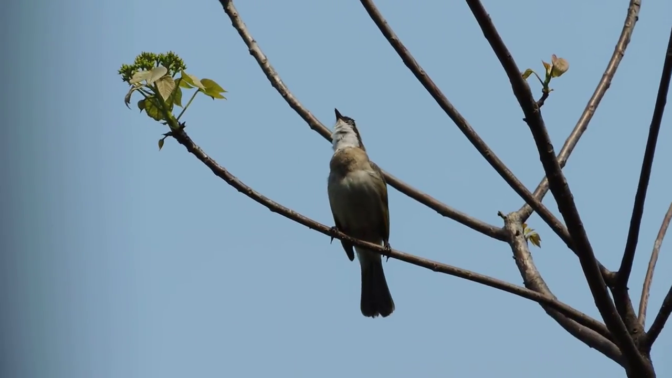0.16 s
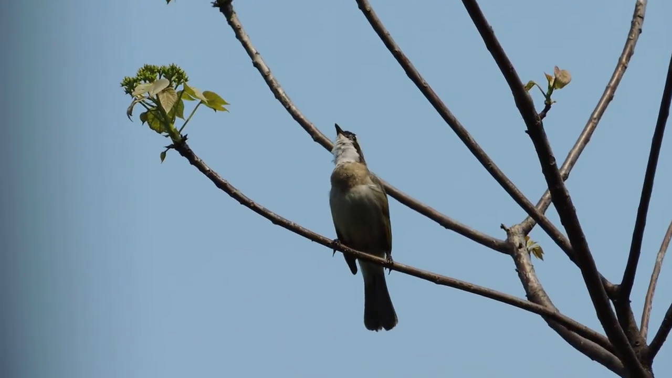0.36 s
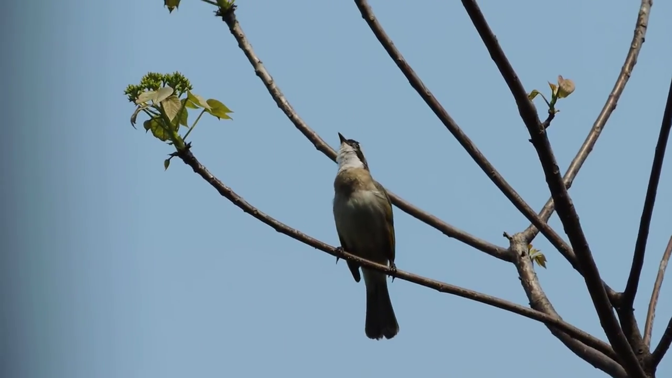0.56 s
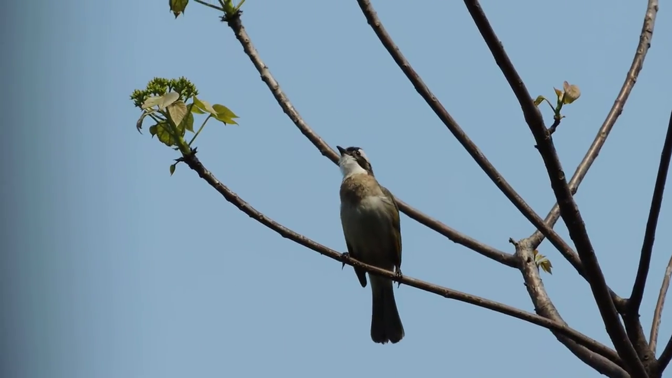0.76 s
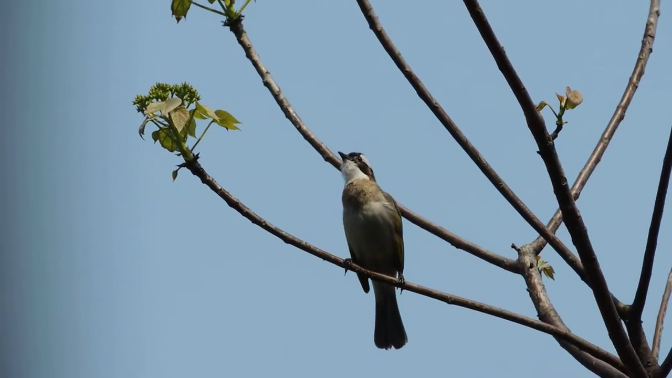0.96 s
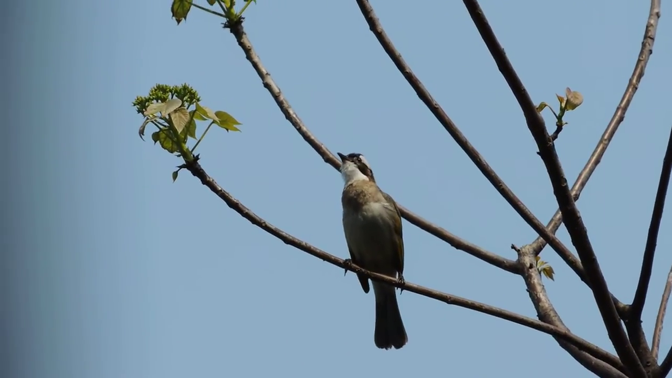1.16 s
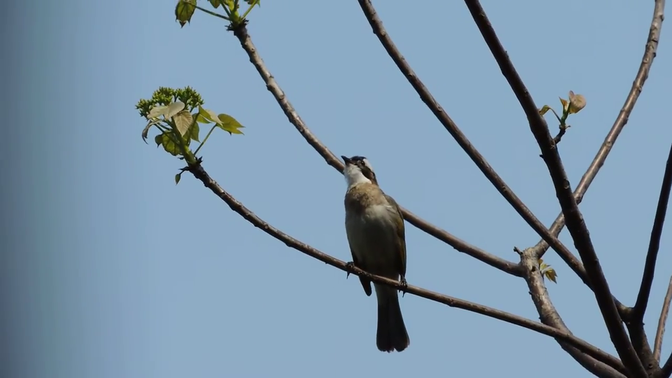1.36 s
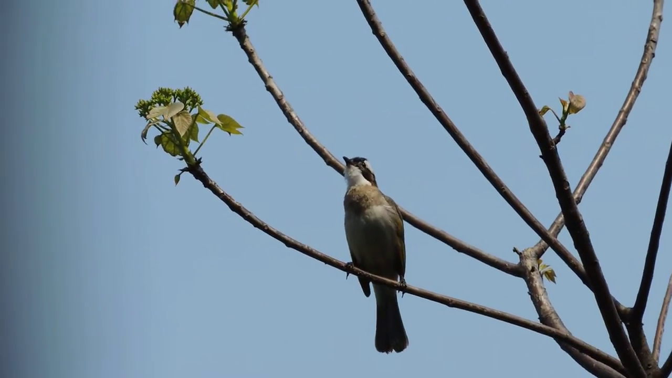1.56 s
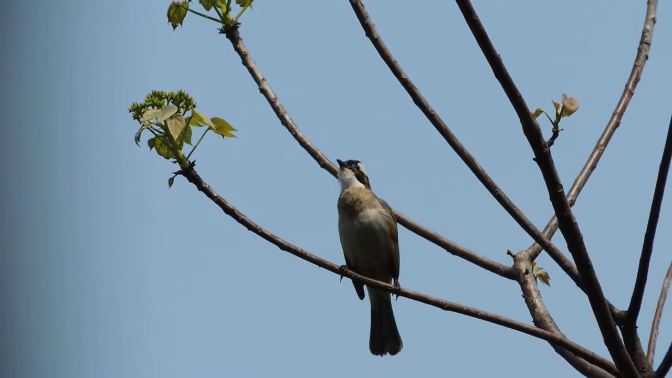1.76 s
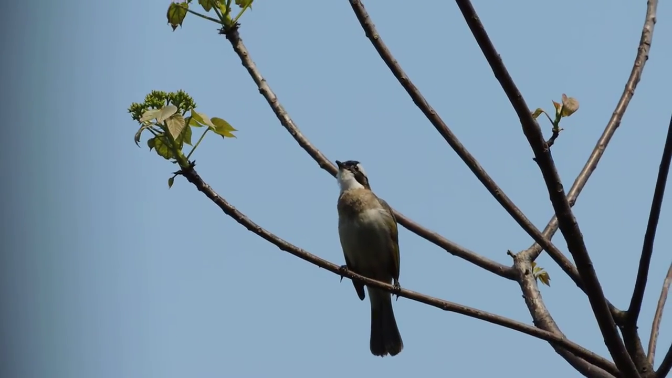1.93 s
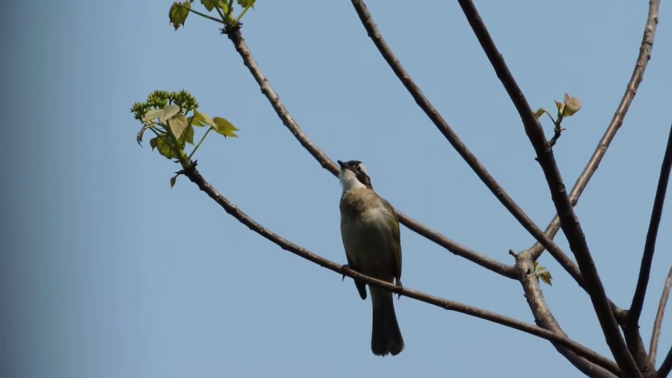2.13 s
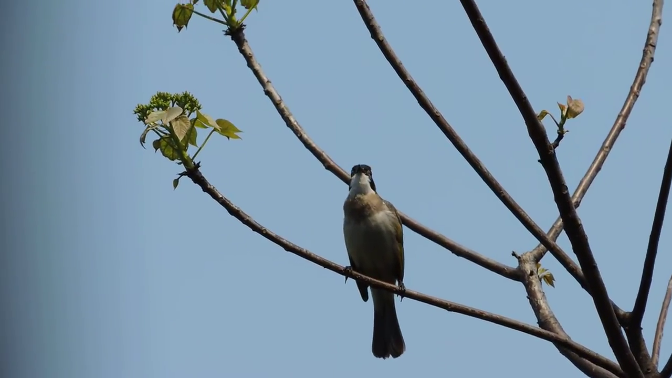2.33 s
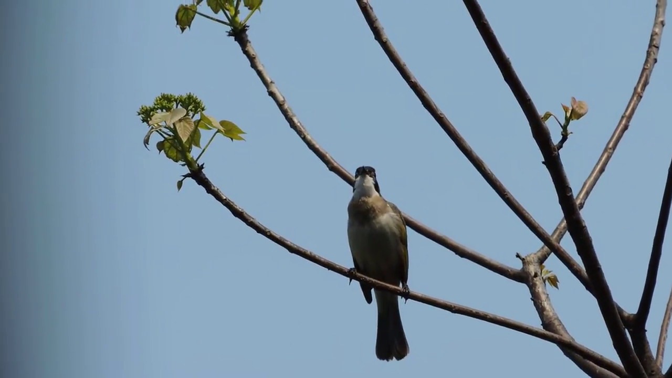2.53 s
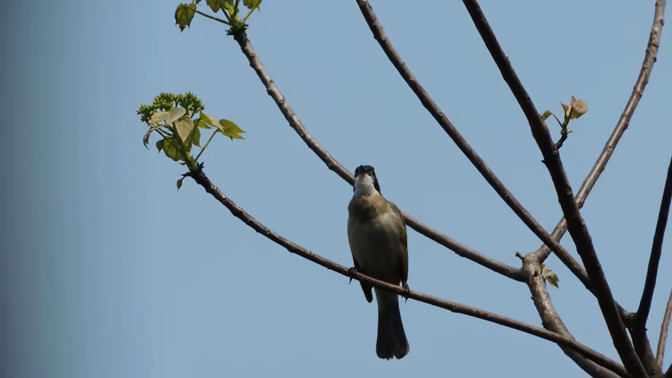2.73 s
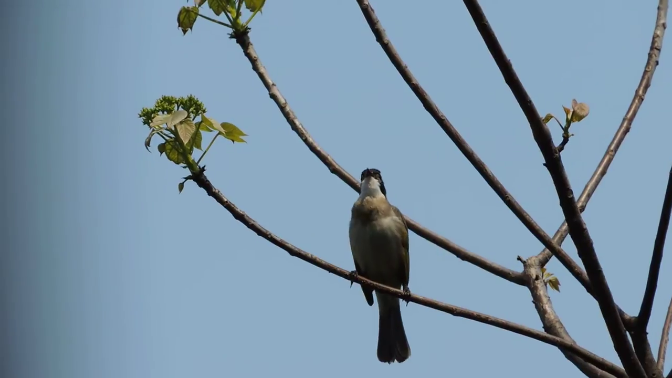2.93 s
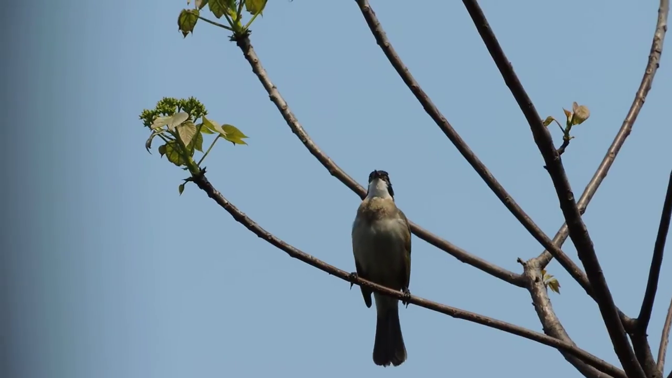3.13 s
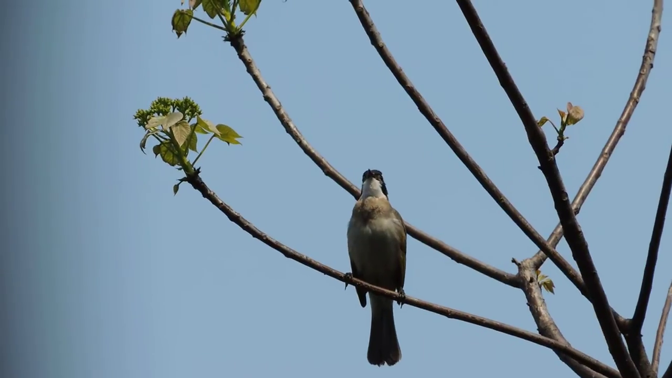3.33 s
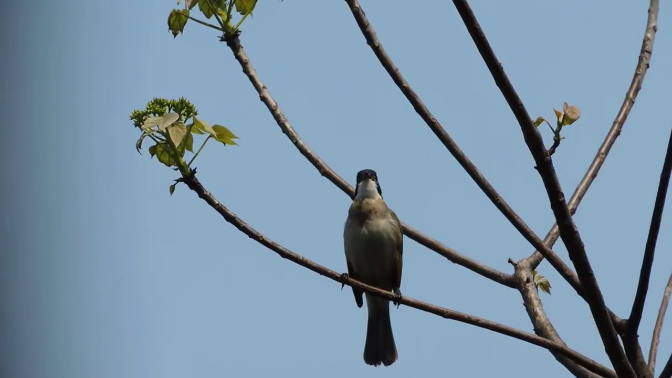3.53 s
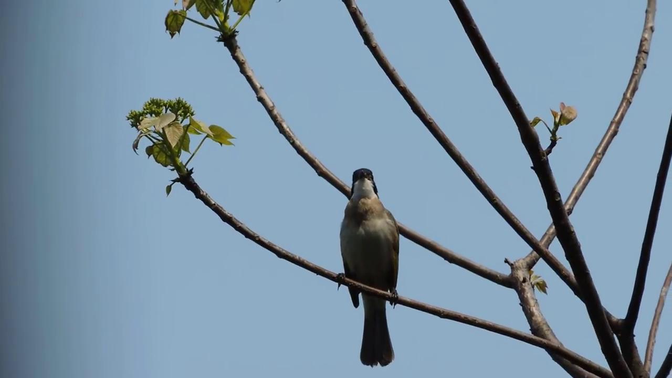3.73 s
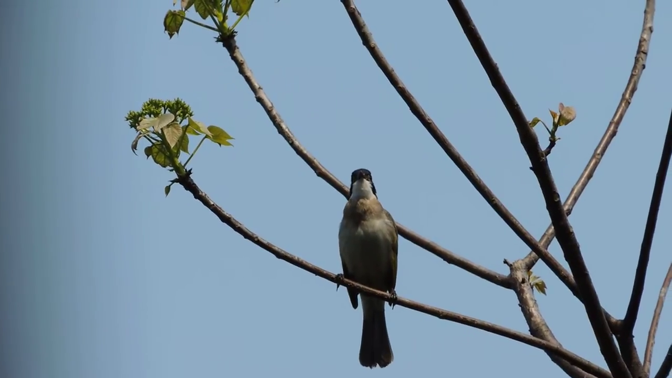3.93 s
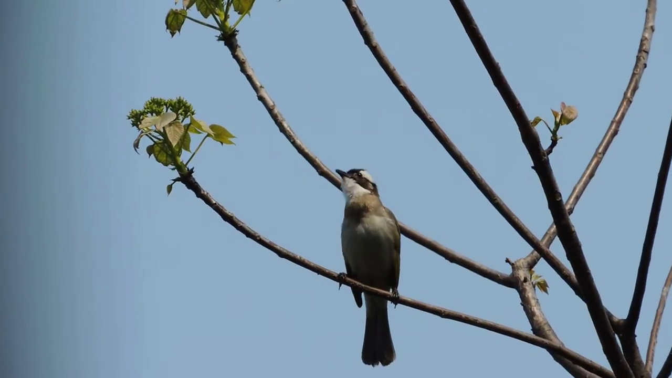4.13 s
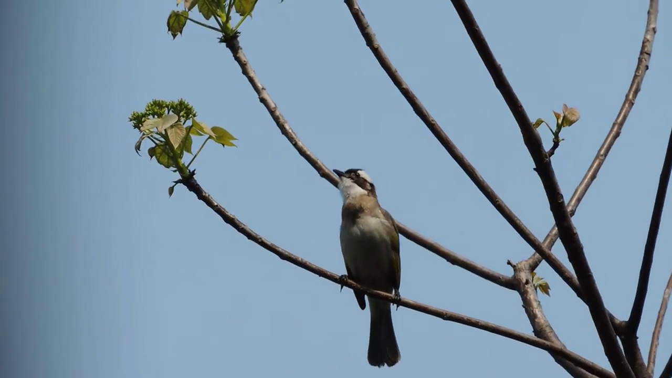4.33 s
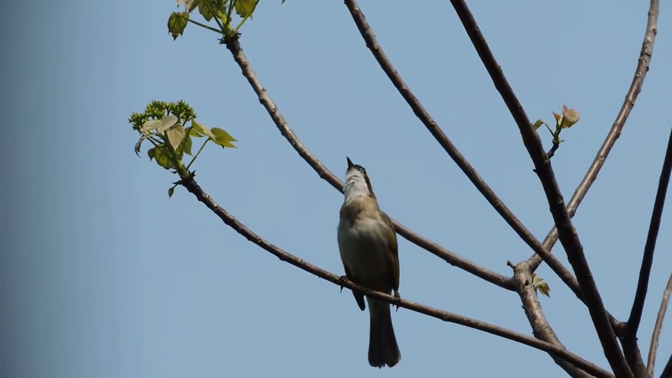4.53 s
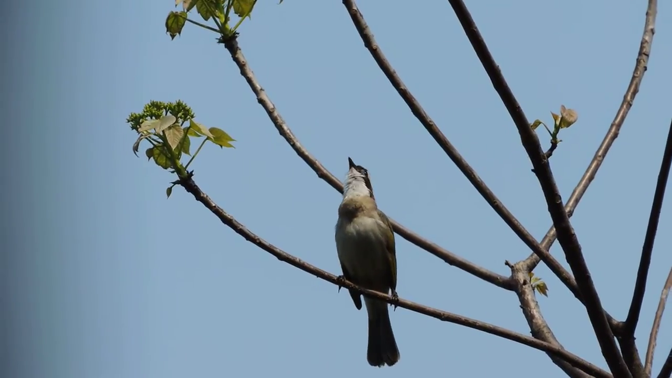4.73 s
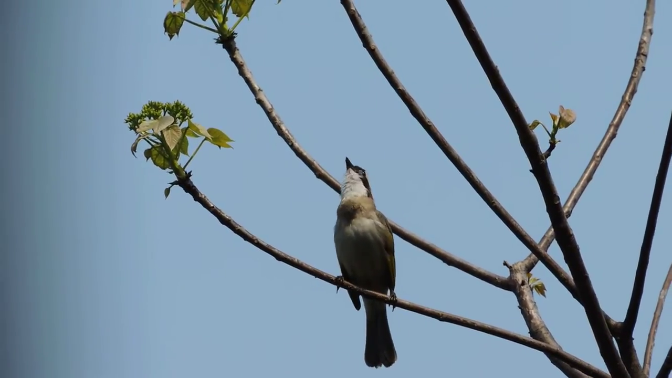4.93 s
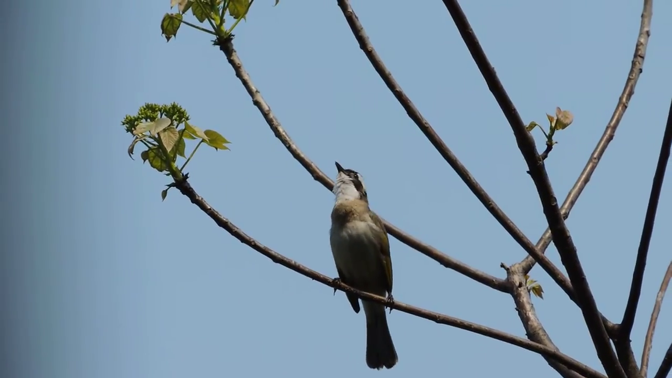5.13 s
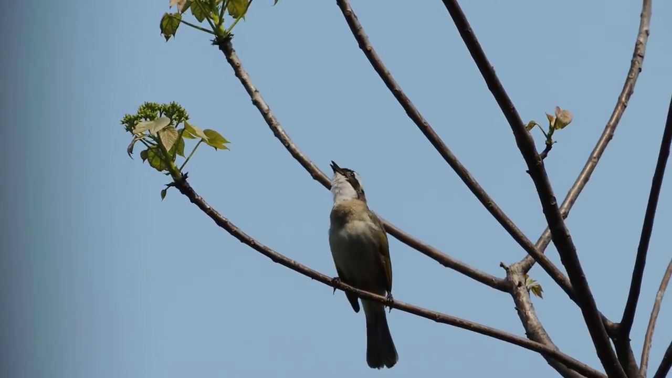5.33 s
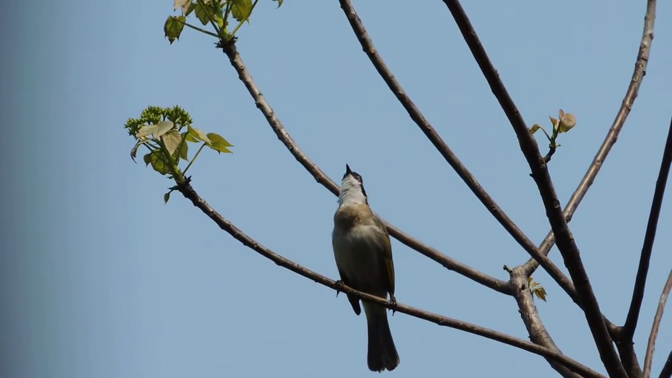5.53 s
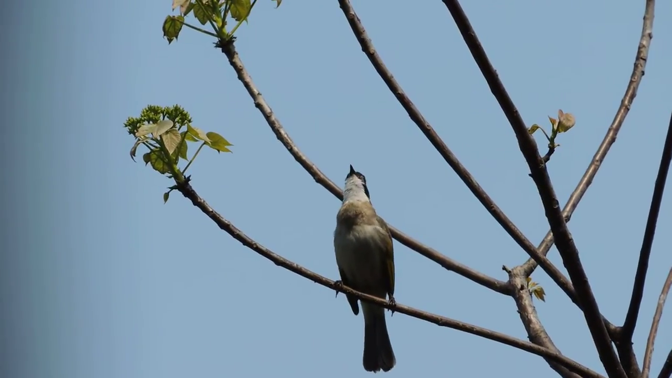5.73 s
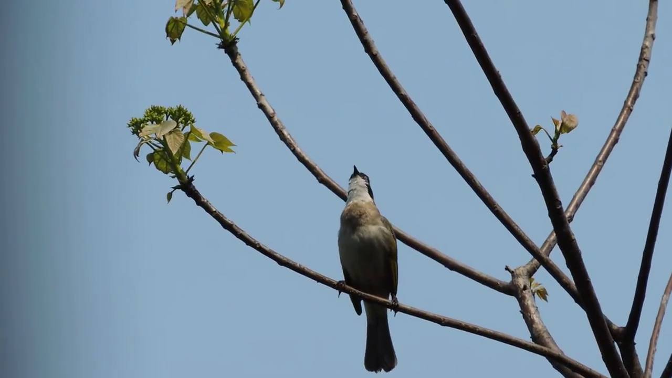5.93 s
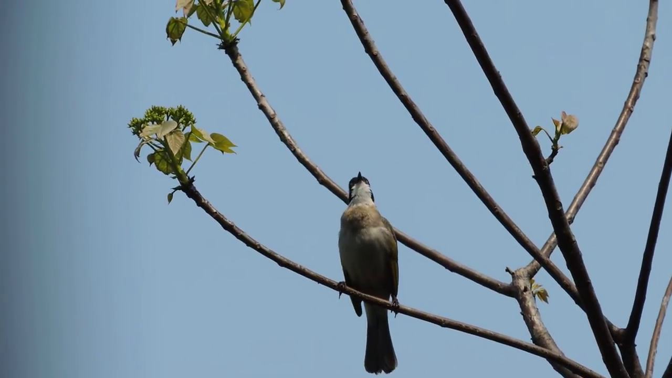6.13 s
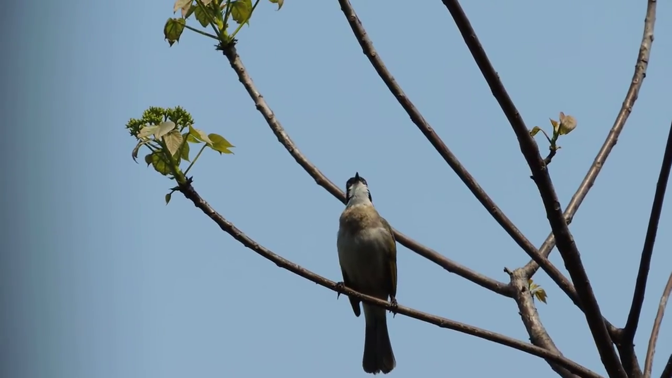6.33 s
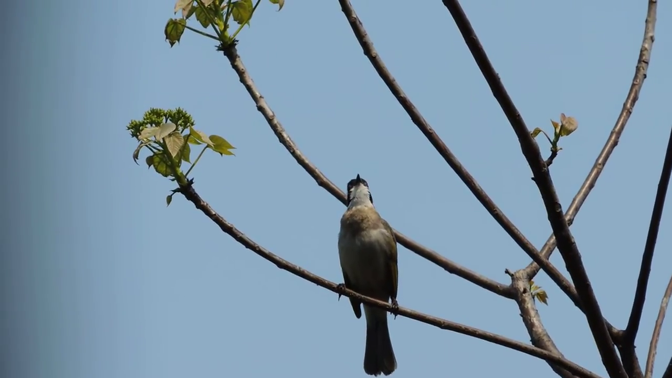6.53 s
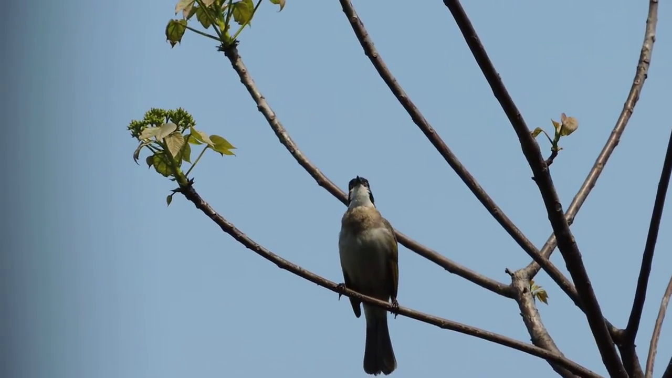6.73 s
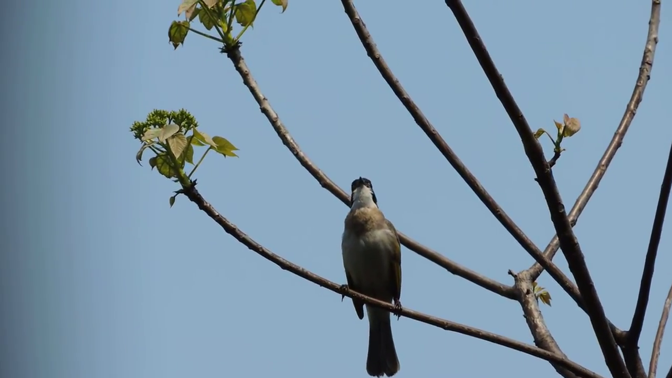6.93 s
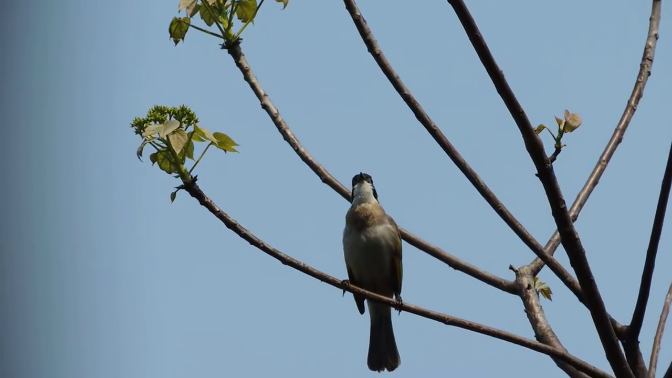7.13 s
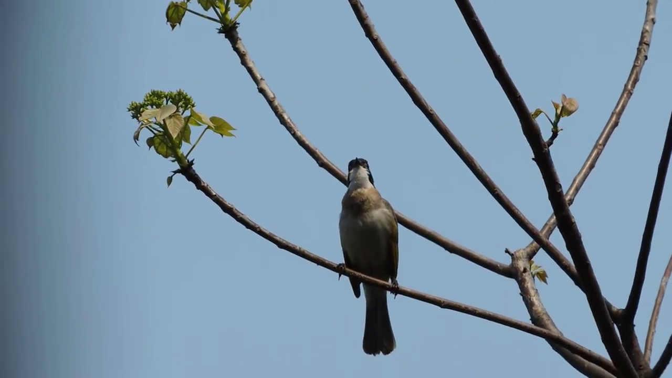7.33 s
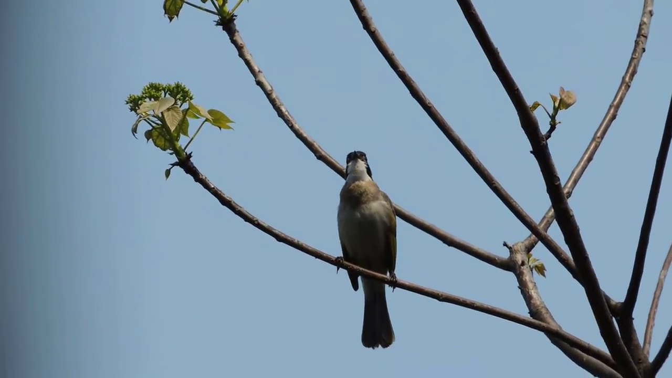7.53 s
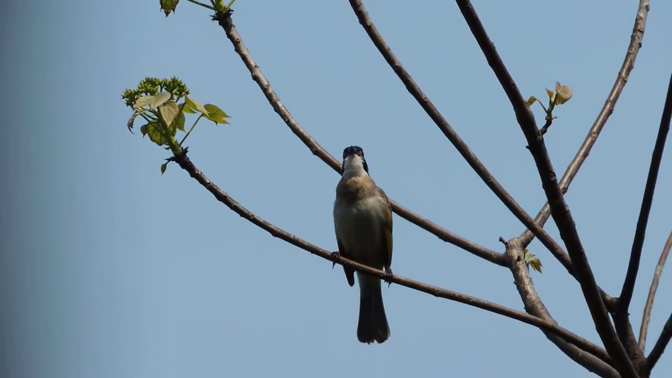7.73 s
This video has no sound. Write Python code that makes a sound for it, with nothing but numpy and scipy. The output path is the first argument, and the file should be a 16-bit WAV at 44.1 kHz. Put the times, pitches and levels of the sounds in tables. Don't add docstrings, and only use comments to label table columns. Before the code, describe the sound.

A single bulbul sings from a bare branch, heard from some distance outdoors. Two very short, rapid phrases of gliding whistles come at the start, with soft low notes between them. A gap of about four seconds leaves only fan hum, distant town rumble and faint hiss, with one dull knock on the camera body. Then a hurried falling phrase and two more bursts ring out, echoing off buildings, before the hum remains alone.

```python
import sys
import numpy as np
from scipy import signal
from scipy.fft import rfft, irfft, next_fast_len
from scipy.io import wavfile
from scipy.ndimage import map_coordinates

SR = 44100
rng = np.random.default_rng(int(sys.argv[2]) if len(sys.argv) > 2 else 0)


def wrap_up_sound(samples):
    columns = np.atleast_2d(samples).T
    tamed = np.clip(columns, -1, 1)
    steps = np.round(tamed * 32767).astype(np.int16)
    wavfile.write(sys.argv[1], SR, steps)


def volts_from_db(level):
    exponent = np.asarray(level, float) / 20
    return 10 ** exponent


N = 347067

# f/Hz, left-right level/dB
LEAN = [(60, 1.7), (280, 1.7), (420, 4), (620, -1.2), (920, .2), (1100, 1.8), (1650, -1.2), (2700, 2.5),
        (4000, 0.4), (8000, 0)]
# f/Hz, lead/rad
LEAD = [(60, -.08), (300, -0.071), (480, 0.45), (800, -.07), (1100, -0.13), (1800, 0.56)]


def unit(x):
    return x / np.sqrt(np.mean(x ** 2) + 1e-20)


def along(points, hz):
    f, v = np.transpose(points)
    return np.interp(np.log(hz + 1), np.log(f + 1), v)


def curves(rows):
    s, *cols = np.transpose(rows)
    return [np.interp(np.arange(N) / SR, s, c) for c in cols]


def wobble(rate):
    knots = rng.standard_normal(int(N * rate / SR) + 4)
    return map_coordinates(knots, [np.arange(N) * rate / SR])


def filtered(x, response):
    m = next_fast_len(N + 8192)
    spectrum = rfft(x, m) * response(np.fft.rfftfreq(m, 1 / SR))
    return irfft(spectrum, m)[..., :N]


def sides(db):
    return volts_from_db(np.array([db / 2, -db / 2]))


def rush(gain):
    # f/Hz, left-right likeness (0 to 1)
    likeness = [(50, 0.96), (270, 0.99), (370, 0.84), (480, 0.89), (620, 0.49), (780, 0.81), (920, 1),
                (1100, 0.41), (1350, 0.32), (1900, 0.18), (2200, 0.015)]

    def ports(hz):
        turn = np.arccos(np.clip(along(likeness, hz), 0, 1)) / 2
        place = sides(along(LEAN, hz)) * np.exp(np.outer([.5j, -.5j], along(LEAD, hz)))
        common = gain(hz) * place * np.cos(turn)
        opposed = gain(hz) * place * np.sin(turn) * [[1], [-1]]
        return common, opposed

    shared, apart = rng.standard_normal((2, N))
    return unit(filtered(shared, lambda hz: ports(hz)[0]) + filtered(apart, lambda hz: ports(hz)[1]))


def town():
    # t/s, level/dB
    swell = [(0, -43), (.59, -44.5), (.74, -46), (1.07, -43), (1.42, -46.5), (4.12, -46.5), (4.32, -45),
             (4.95, -46), (5.26, -48), (5.9, -47), (7.87, -46.5)]
    # f/Hz, level/(dB per Hz)
    rumble = [(12, -54), (20, -19.5), (50, -13.5), (80, -14), (125, -8), (170, -13.5), (246, -8),
              (330, -18), (460, -23), (600, -27.5), (888, -23.5), (1160, -31), (1500, -34), (3300, -86)]
    # f/Hz, level/(dB per Hz)
    air = [(710, -40), (1200, -11.5), (1800, -7), (3600, -13), (5300, -16), (13600, -19.5), (14200, -20.5)]
    traffic_db, = curves(swell)

    def low_share(hz):
        return 1 / (1 + (hz / 450) ** 6)

    traffic = rush(lambda hz: volts_from_db(along(rumble, hz)) * np.sqrt(low_share(hz)))
    drone = rush(lambda hz: volts_from_db(along(rumble, hz)) * np.sqrt(1 - low_share(hz)))
    hiss = rush(lambda hz: volts_from_db(along(air, hz)))
    traffic = volts_from_db(traffic_db + 3.0 + 0.59 * wobble(rate=7)) * traffic
    drone = volts_from_db(-49 + 0.15 * wobble(rate=1.72)) * drone
    hiss = volts_from_db(-51 + 0.25 * wobble(rate=2.59)) * hiss
    return traffic + drone + hiss


def fan():
    # f/Hz, pitch width/Hz, rms level/dB
    rotor = [
        (59.5, 4.6, -56.5),
        (116.7, 0.798, -42.5),
        (1882, 45, -64),
    ]
    # f/Hz, pitch width/Hz, rms level/dB
    whine = [(870, 1.2, -65), (1844, .6, -75), (1859, .5, -68), (1882, .5, -69), (1902, .6, -73)]
    out = np.zeros((2, N))
    for hz, waver_hz, db in [*rotor, *whine]:
        turns = 2 * np.pi * np.cumsum(hz + waver_hz * wobble(rate=3 + waver_hz)) / SR
        lead = along(LEAD, hz) * np.array([[.5], [-.5]])
        strength = volts_from_db(db + 2.5 + 1.4 * wobble(rate=4 + waver_hz / 3))
        out += strength * sides(along(LEAN, hz))[:, None] * np.sin(turns + lead)
    return out


def song():
    # delay/s, length/s, first and last pitch (0 = bottom, 1 = top), level/dB
    opening = [
        (-.003, .005, -.2, 1.85, -24),
        (0, .0052, 1.05, 0.73, 0),
        (.0045, 0.009, 0.51, 0.51, -6),
        (.0095, 0.0084, 0.48, 0.66, -5.5),
        (.018, 0.014, 0.012, 0.17, -5.5),
    ]
    middle = [
        (0, 0.011, 1.26, .25, 0),
        (.0095, .011, 0.46, .1, -2),
        (.018, .009, .1, -0.08, -7.5),
    ]
    closing = [
        (0, .013, 0.93, .05, 0.5),
        (.0105, 0.0049, 0.24, .02, -2),
        (.0135, .012, .05, .03, -2),
    ]
    # t/s, top f/Hz, bottom f/Hz, peak level/dB, beak opening/dB
    openings = [
        (-.009, 3405, 2436, -20, 4.5),
        (0.4196, 3180, 2355, -19.5, 0.5),
        (5.126, 3180, 2402, -22, 7),
        (5.553, 3270, 2495, -20, -1),
    ]
    middles = [
        (.025, 2820, 2640, -22.5, -1),
        (.451, 2820, 2730, -20.5, 5.5),
        (5.158, 2966, 2620, -21.5, 4),
        (5.587, 3060, 2790, -19, 3),
    ]
    closings = [
        (.068, 2940, 2655, -23.5, 0.9),
        (.495, 2890, 2690, -21.5, 0.9),
        (5.2, 2860, 2660, -23.5, -1.16),
        (5.631, 2984, 2660, -22, -1.1),
    ]
    # t/s, length/s, f/Hz, peak level/dB, overtone level/dB
    low_ends = [
        (.053, .015, 2440, -25, -7.5),
        (0.475, 0.027, 2440, -24, -14),
        (5.186, .013, 2430, -25.5, -4.5),
        (5.615, 0.018, 2470, -23.5, -15),
    ]
    # t/s, length/s, first f/Hz, last f/Hz, peak level/dB
    hurried = [(4.718, 0.0056, 2780, 3030, -42), (4.7218, 0.017, 3060, 2630, -21),
               (4.735, 0.0093, 2670, 2700, -25), (4.74, .007, 3050, 2300, -29),
               (4.746, 0.0084, 2340, 2290, -24.5), (4.755, .007, 2930, 2620, -34),
               (4.758, 0.011, 2510, 2420, -26.5), (4.768, 0.014, 2385, 2410, -23),
               (4.781, 0.0091, 2360, 2410, -26.5)]
    # t/s, length/s, first f/Hz, last f/Hz, peak level/dB
    low_notes = [(0.25, .011, 1580, 1716, -40.5), (.266, 0.053, 1496, 1460, -41.5),
                 (.329, 0.045, 1897, 1846, -46), (4.582, .009, 2560, 2220, -30),
                 (4.684, 0.041, 1645, 1528, -38.5), (5.371, 0.062, 1498, 1616, -46),
                 (5.404, .05, 1410, 1500, -44), (5.449, .05, 1476, 1430, -50),
                 (5.421, 0.0324, 1800, 1950, -47), (5.463, 0.053, 1970, 2055, -42)]
    # t/s, length/s, f/Hz, peak level/dB, overtone level/dB
    soft = [
        (0.298, .039, 1847, -36.5, -5),
        (5.443, .021, 1950, -43.5, 8.5),
    ]
    shut_db = -26

    def richness_db(hz):
        return -6.5 - 20.5 * abs(hz - 2440) / 1000

    trills = []
    for shape, sung in [(opening, openings), (middle, middles), (closing, closings)]:
        for s, top, low, db, beak_db in sung:
            for delay, length, first, last, note_db in shape:
                first_hz = low + first * (top - low)
                last_hz = low + last * (top - low)
                overtone_db = beak_db + richness_db(first_hz)
                trills.append((s + delay, length, first_hz, last_hz, db + note_db, overtone_db))
    dips = [(s, length, hz, hz * 0.95, db, overtone_db) for s, length, hz, db, overtone_db in low_ends]
    slurs = [(s - .006, .006, 2980, 1950, db - 8, shut_db) for s, _, _, db, _ in low_ends]
    chatter = [(*note, richness_db(note[2]) - 1) for note in hurried]
    murmurs = [(*note, shut_db) for note in low_notes]
    whistles = [(s, length, hz, hz * 1.055, db, overtone_db) for s, length, hz, db, overtone_db in soft]
    return trills + dips + slurs + chatter + murmurs + whistles


def bulbul():
    # f/Hz, level/dB
    ringing = [(4000, -19.5), (6000, -14), (7500, -23), (8600, -22.5), (9500, -4), (11500, -6.5),
               (12500, -13), (14000, -18.5)]
    lead = SR // 40
    voice, overtones, effort = np.zeros((3, N + lead))
    for s, length, first_hz, last_hz, db, overtone_db in song():
        u = np.linspace(0, 1, round(length * SR))
        hz = first_hz + (last_hz - first_hz) * u ** 0.73
        turns = 2 * np.pi * (np.cumsum(hz) / SR + rng.random())
        breath = np.sin(np.pi * u ** .85) ** .75
        start = lead + round(s * SR)
        at = slice(start, start + len(u))
        voice[at] += volts_from_db(db) * breath * np.sin(turns)
        effort[at] += volts_from_db(db) * np.sqrt(breath)
        for k in np.arange(4, 15) / 2:
            uneven_db = (-56 - 0.35 * overtone_db) * (k % 1 > 0)
            bright_db = np.where(k * hz > 8000, overtone_db, -17)
            level_db = db + bright_db + uneven_db + along(ringing, k * hz) - 7 * max(k - 4, 0)
            overtones[at] += volts_from_db(level_db) * breath ** 1.3 * np.sin(k * turns)
    flutter = volts_from_db(2.65 * wobble(rate=280))
    rasp = unit(filtered(rng.standard_normal(N), lambda hz: volts_from_db(along(ringing, hz)) * (hz > 3500)))
    return voice[lead:], flutter * overtones[lead:] + volts_from_db(-26) * effort[lead:] * rasp


def walls(x, near_db, blur_db, long_db, far_db):
    # f/Hz, t60/s
    blur_decay = [(1500, .9), (2000, 0.22), (2700, 0.48), (6000, 0.24), (10000, 0.17)]
    hz, t, z = signal.stft(rng.standard_normal((2, 3 * SR // 2)), SR, nperseg=256)
    near = volts_from_db(near_db - 0.23 * hz[:, None] / 1000 - 60 * t / 0.16)
    blur = volts_from_db(blur_db - 60 * t / along(blur_decay, hz)[:, None]) * np.clip(t / 0.011, 0, 1)
    air_db = -3.5 * hz[:, None] / 1000
    long = volts_from_db(long_db + air_db - 60 * t / 5.5)
    far = volts_from_db(far_db + air_db - 60 * np.abs(t - .44) / 0.63) * (t > .4)
    farther = volts_from_db(far_db - 8.0 + air_db - 60 * np.abs(t - 1.03) / 0.3)
    tail = signal.istft(z * (near + blur + long + far + farther), SR, nperseg=256)[1]
    delayed = np.pad(x, (130, 0))[None]
    return signal.fftconvolve(delayed, tail, axes=1)[:, :N]


def handling():
    # t/s, level/dB, f/Hz, t60/s
    knocks = [
        (2.645, -27, 112.3, 0.31),
        (7.004, -46, 4200, .08),
        (7.016, -46, 3600, .1),
    ]
    out, t = np.zeros(N), np.arange(SR // 5) / SR
    for s, db, hz, t60 in knocks:
        scatter = np.cumsum(rng.standard_normal(len(t))) * hz / 22000
        swell = volts_from_db(db - 60 * t / t60) * (1 - np.exp(-12 * t / t60))
        out[round(s * SR):][:len(t)] += swell * np.sin(2 * np.pi * hz * t + scatter)
    return out


def scene():
    # t/s, left-right level of the voice/dB, of its overtones/dB
    head = [(.05, 0.5, -7.5), (.3, 2, -3), (.47, 0, -8), (4.75, 0, -10.5), (5.17, 0, -8), (5.45, 0, -6),
            (5.6, -2.5, -8)]
    # f/Hz, lead/rad
    bird_lead = [(2400, -0.71), (2900, -0.55), (9600, 1), (11000, -0.22)]
    voice, overtones = bulbul()
    voice_db, overtone_db = curves(head)
    bird = voice * sides(voice_db) + overtones * sides(overtone_db)
    bird = filtered(bird, lambda hz: np.exp(np.outer([.5j, -.5j], along(bird_lead, hz))))
    echoes = walls(voice + overtones, near_db=-37, blur_db=-42.5, long_db=-56.5, far_db=-53.0)
    return bird + echoes + town() + fan() + handling()


def low_pass(x):
    return signal.sosfilt(signal.butter(12, 15300, fs=SR, output="sos"), x)


def record(dry):
    mix = filtered(dry, lambda hz: hz < 14250)
    return low_pass(mix)


dry = scene()
out = record(dry)
wrap_up_sound(out)
```